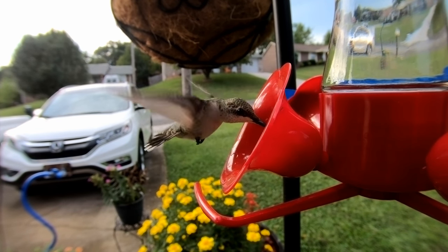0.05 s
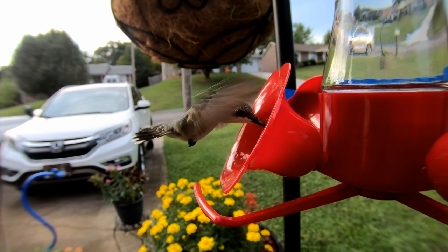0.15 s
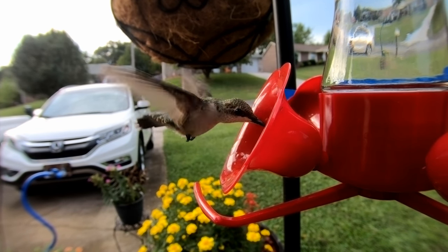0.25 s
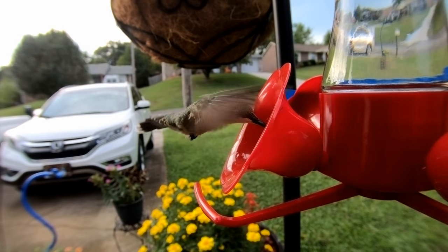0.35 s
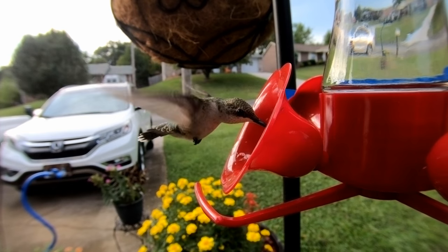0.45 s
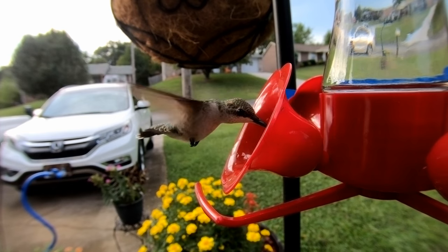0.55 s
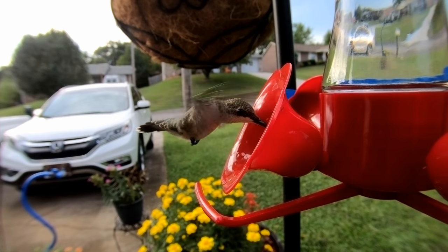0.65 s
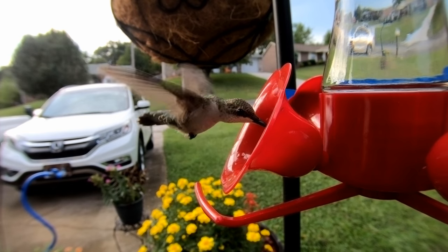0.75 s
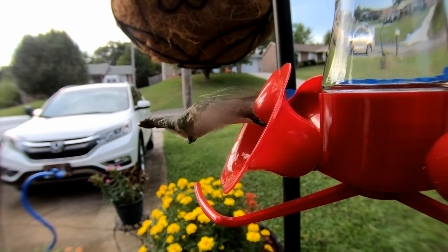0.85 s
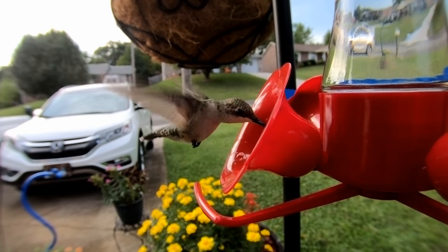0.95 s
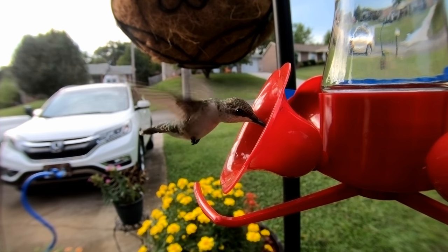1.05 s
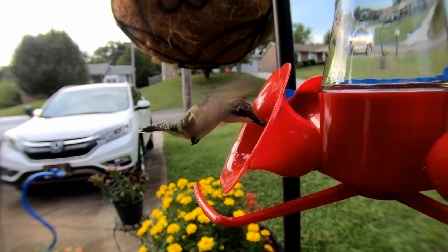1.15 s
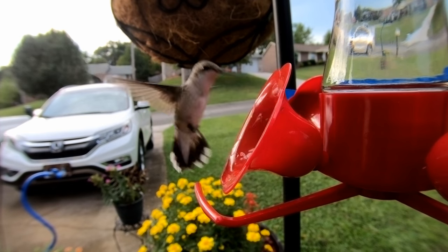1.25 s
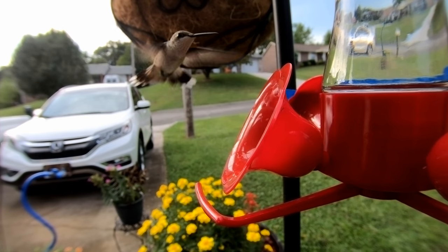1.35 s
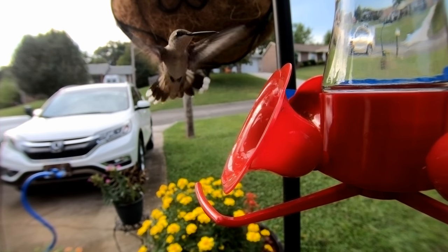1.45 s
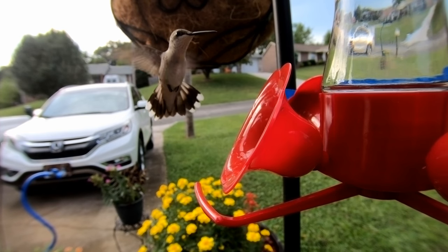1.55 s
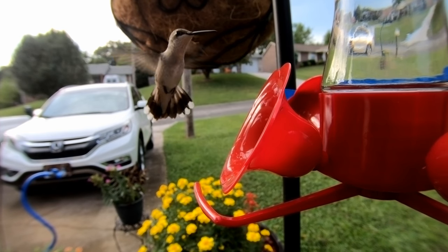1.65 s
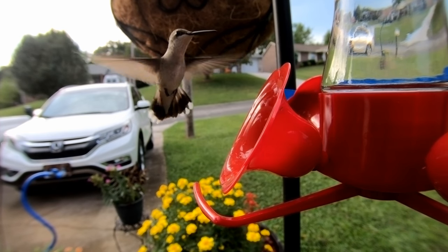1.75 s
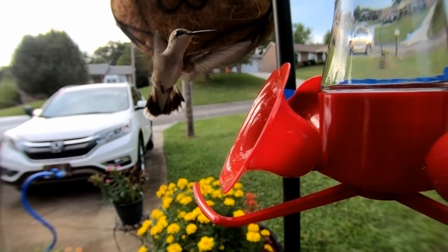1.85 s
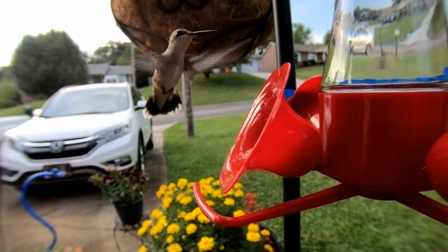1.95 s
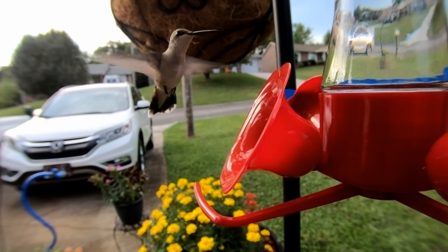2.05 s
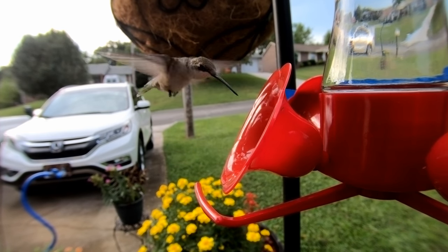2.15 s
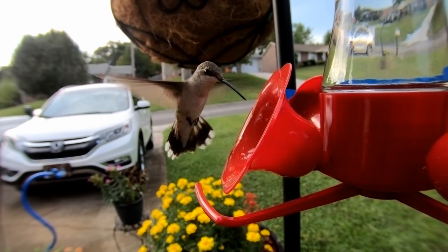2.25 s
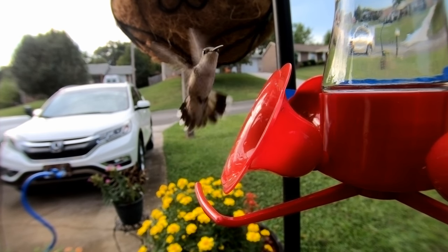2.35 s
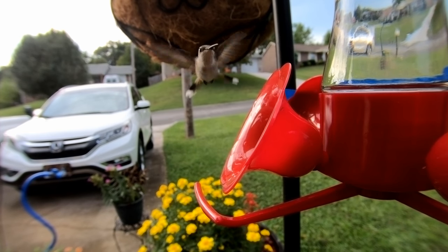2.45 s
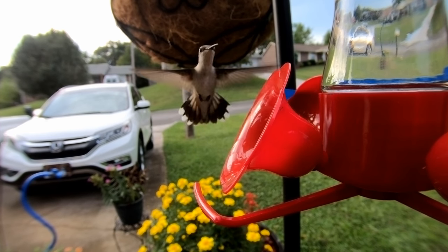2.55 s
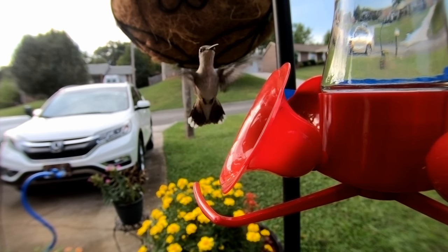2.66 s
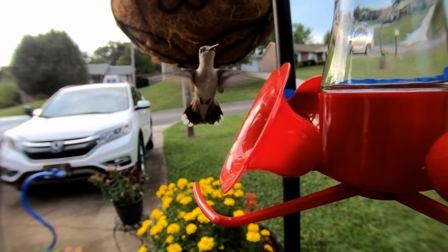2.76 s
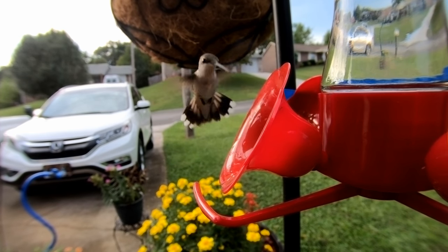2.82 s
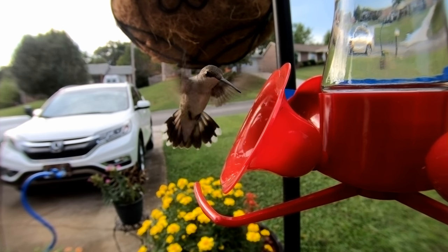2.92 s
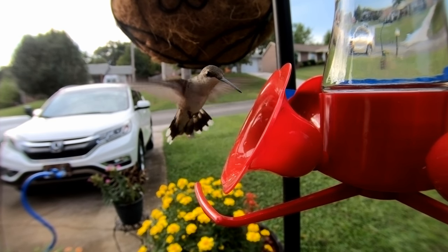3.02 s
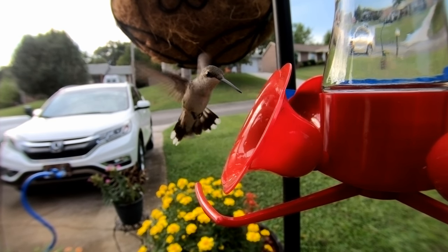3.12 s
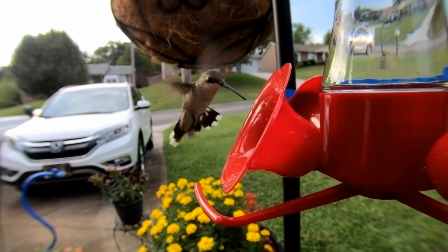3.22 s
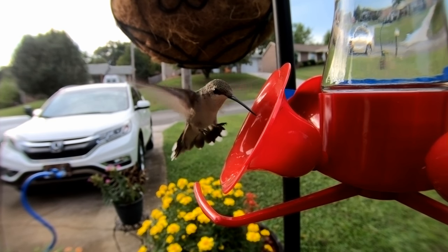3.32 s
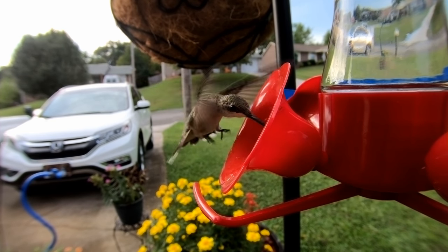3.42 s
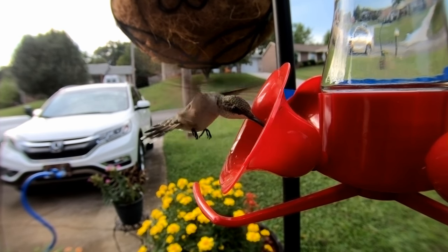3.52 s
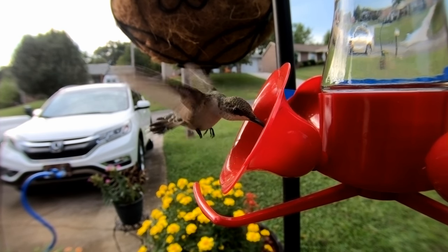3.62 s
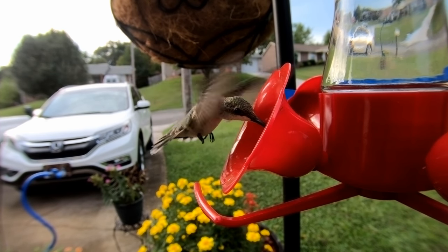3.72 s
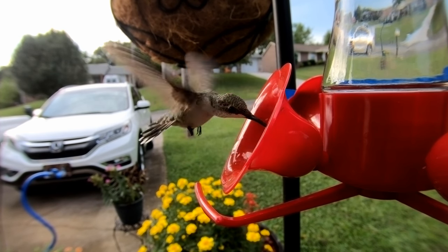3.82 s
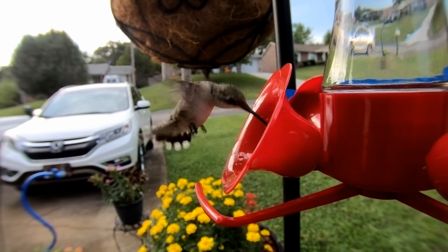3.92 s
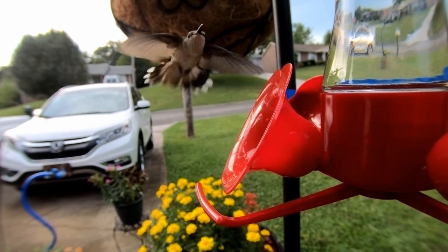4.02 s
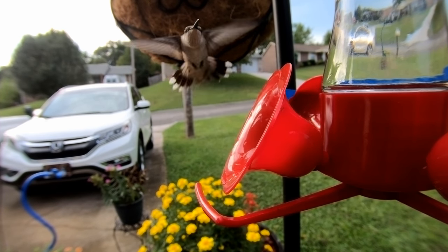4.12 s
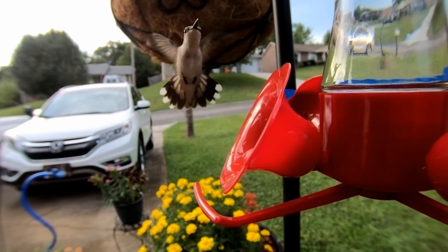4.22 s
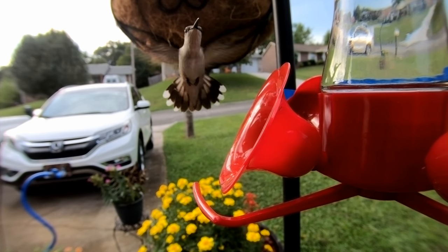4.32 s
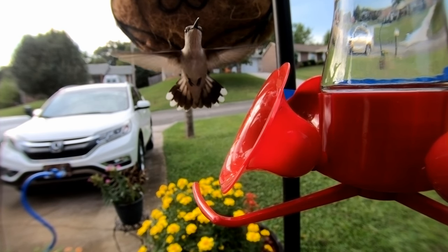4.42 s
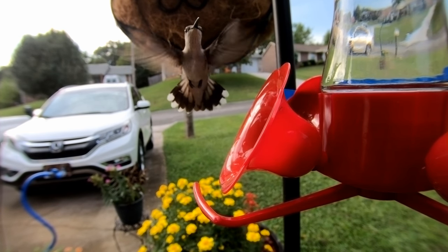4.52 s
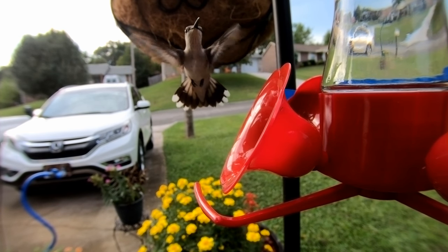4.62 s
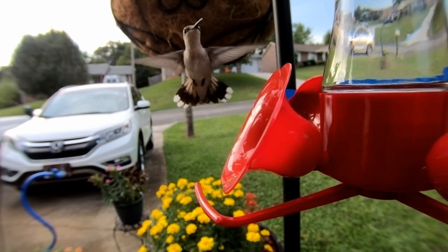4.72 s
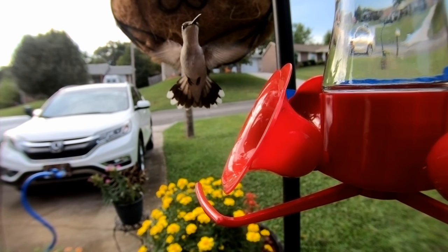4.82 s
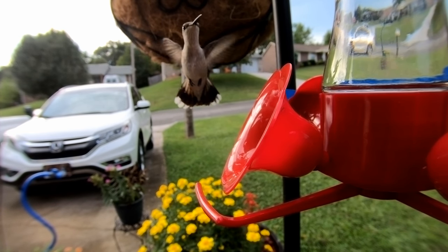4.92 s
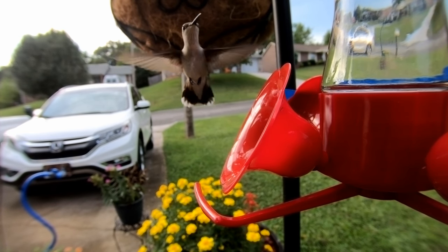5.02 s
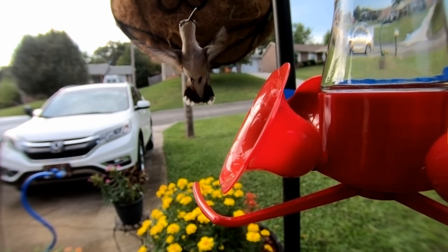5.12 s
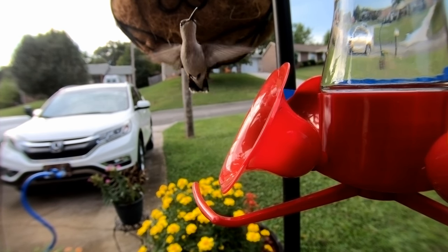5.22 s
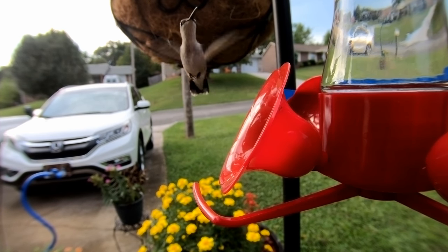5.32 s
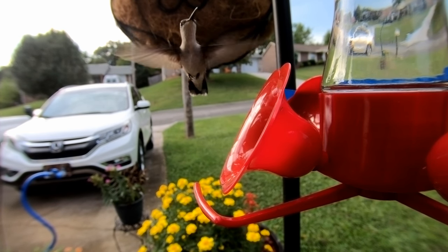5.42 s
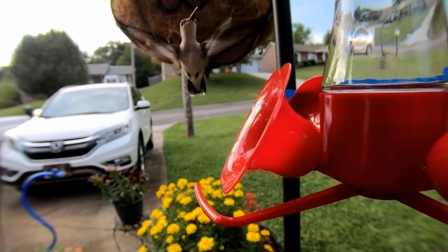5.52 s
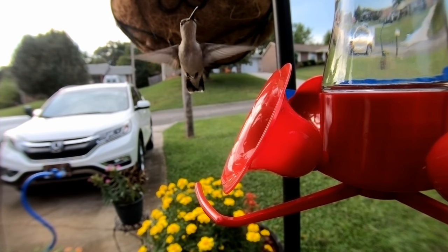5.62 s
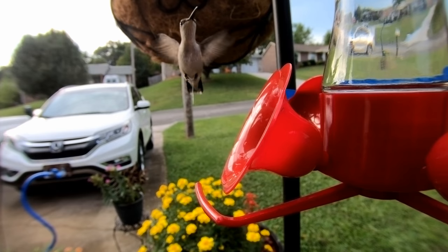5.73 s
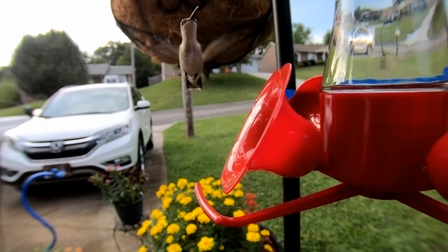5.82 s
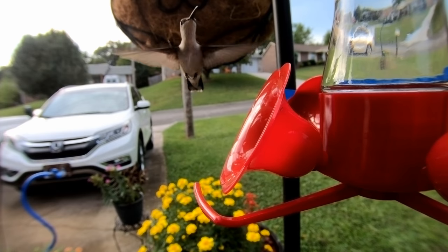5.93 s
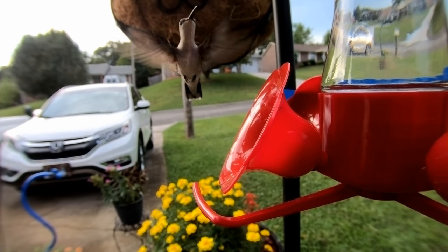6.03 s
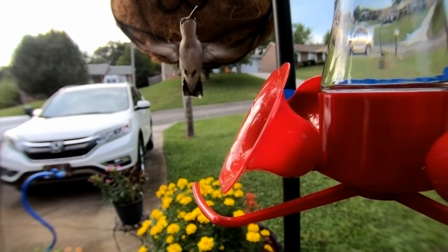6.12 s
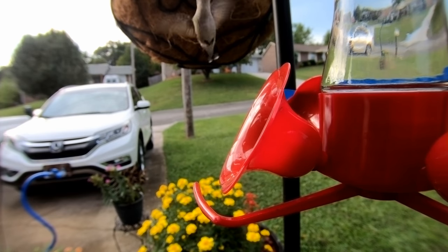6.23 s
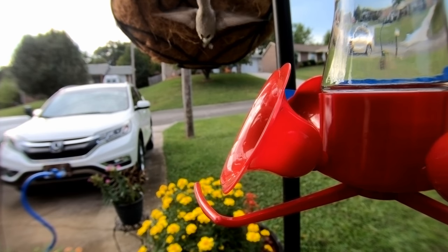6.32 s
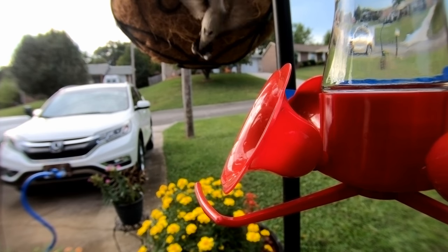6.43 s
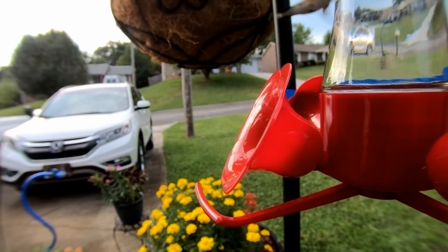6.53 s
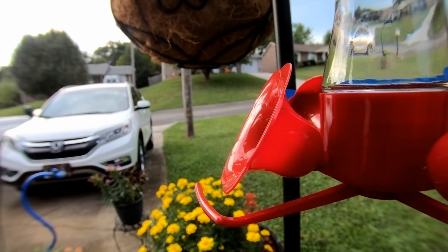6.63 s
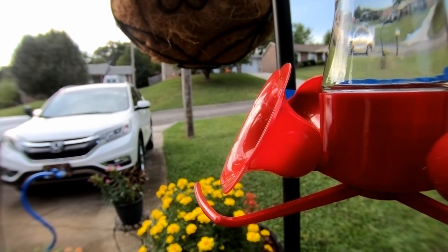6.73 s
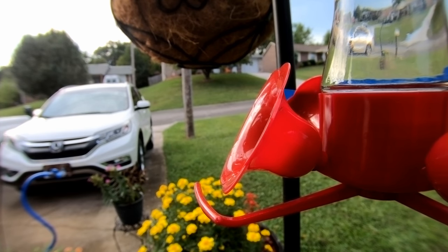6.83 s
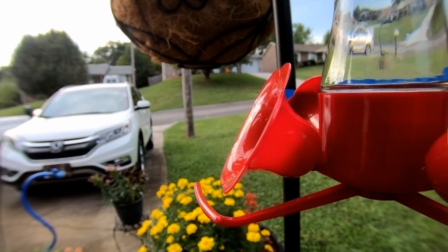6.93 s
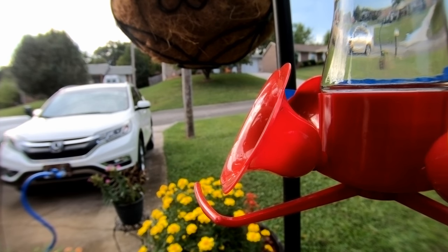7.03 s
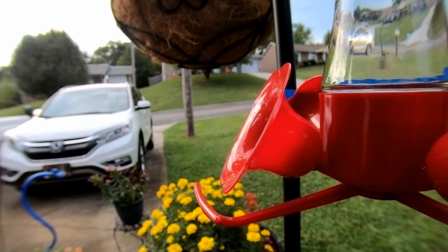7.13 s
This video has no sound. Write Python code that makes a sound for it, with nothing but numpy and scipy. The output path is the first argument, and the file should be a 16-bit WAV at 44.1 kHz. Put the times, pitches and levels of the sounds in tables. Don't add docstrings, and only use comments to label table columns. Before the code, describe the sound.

A small stereo microphone sits an arm's length from a garden feeder. From the start a hummingbird's low, buzzing wing hum dominates, roughly 41 to 46 strokes a second, with breathy chopped downwash. It rocks gently for the first second, then surges and breaks briefly around 1.3-1.6, 2.1-2.6 and 4.1-4.2 seconds, with low air buffets at 2.1-2.2. Upright hovering sounds buzzier. Underneath are steady leaf and insect hiss, faint traffic rumble, scattered dry ticks, soft feather flicks and very faint thin squeaks of the hook almost every second. Tiny distant bird chips come at 0.7, 2.2 and 4.95. At 4.9 a soft hollow knock bounces several times. From 6.2 stiff fabric snaps and crinkles near the microphones, strongest at 6.5-6.75. The hum hesitates near 6.4, a dull wing slap lands at 6.58, and the hum vanishes by about 6.7, leaving low wake puffs, lighter scraping and garden hiss until about 7.1.

```python
import sys
import numpy as np
from scipy import signal
from scipy.fft import rfft, irfft, next_fast_len
from scipy.io import wavfile
from scipy.ndimage import uniform_filter1d, map_coordinates

SR = 44100
rng = np.random.default_rng(int(sys.argv[2]) if len(sys.argv) > 2 else 0)


def store_pcm(level_fs):
    pcm = np.round(np.clip(level_fs, -1, 1) * 32767).astype(np.int16)
    wavfile.write(sys.argv[1], SR, np.atleast_2d(pcm).T)


def elevation(decibels):
    levels = np.asarray(decibels, float)
    return 10 ** (levels / 20)


N = 316197

# freq_hz, likeness_0_to_1
PORT_LIKENESS = [(60, 1), (140, 0.98), (310, 0.64), (690, .75), (1560, 0.099), (3520, 0.68), (6500, 0.79),
                 (9000, 0.081)]
# freq_hz, level_db
PORT_TILT = [(60, 2), (140, -2.5), (310, -5), (690, -1), (1300, 0.5), (3000, 3), (6500, -10), (9000, -3),
             (13000, -4)]
# freq_hz, lead_rad
PORT_LEAD = [(0, -2), (520, 0.8349), (1460, 2), (3190, 0.72), (3960, 1.5), (5430, 1), (6890, 5.5),
             (8100, -1)]
# freq_hz, level_db
MIC_RESPONSE = [(20, 11.5), (2000, -1.5), (6500, -4), (7600, -12.5), (8400, -28), (13000, -43),
                (16000, -63)]

# time_s, wingbeat_hz, effort_db, upright_0_to_1, upper_order_crispness_db
HOVER = [(0, 44.06, -27.5, 0.01, 4), (.25, 46.54, -30, 0.1, 4), (.4, 44.5, -31.5, 0.4, 4.5),
         (1.22, 43.1, -29, 0.28, 2.5), (1.5, 41.85, -28, 0.65, 1), (1.75, 41.34, -27, 1, 0.5),
         (2.05, 42.1, -29.5, 1, 1), (2.3, 43.8, -25.5, 0.63, -1.5), (2.68, 42.88, -28.5, 0.8, 0),
         (2.92, 41, -30, 0.9, -0.5), (3.3, 41.79, -27, 0.66, 1), (3.4, 46.3, -25.5, 0.39, 2.5),
         (4.0, 45.99, -28.5, 0.03, 2), (4.2, 41.33, -28.5, 0.87, 1), (5.12, 42.14, -25, 0.81, -4),
         (5.5, 42.41, -27, 0.61, -2.5), (6.2, 42.05, -26, 0.74, -2.5), (6.66, 44.32, -25.5, 0.8, -3)]
# time_s, half_length_s, extra_effort_db, faster_beat_hz
SURGES = [(1.055, 0.034, 2, 1), (1.349, 0.042, 8.5, 5.5), (1.625, 0.044, 2, 3.5), (2.096, 0.035, 10, 4),
          (2.419, 0.041, 7.5, 6), (3.063, 0.05, 7, 4.5), (3.429, 0.044, 2.5, 1), (3.577, 0.047, 1.5, 2.5),
          (3.856, 0.045, 4, 0), (4.067, 0.058, 9, 7.5), (4.28, .05, -0.5, 2.5), (4.83, 0.047, 1.5, .5),
          (6.272, .05, 5, 8), (6.551, .03, 4, 2.5), (6.668, 0.043, 4.5, 1), (2.17, 0.049, -0.5, 0)]
# time_s, half_length_s, lost_effort_db
GLIDES = [(1.125, 0.03, 4), (1.43, 0.025, 8.5), (1.53, 0.037, 11), (2.267, 0.02, 10), (2.496, .015, 12),
          (2.572, 0.036, 20.5), (2.806, 0.018, 2.5), (4.19, 0.041, 18.5), (6.35, 0.04, 17.5),
          (6.43, 0.055, 8.5), (6.6, .025, 6)]
# time_s, half_length_s, shift_hz
NUDGES = [(.12, 0.024, -2.5), (.27, 0.029, 1.5), (.35, 0.032, -1.5), (.63, 0.03, -1), (.8, .02, 2),
          (1.04, 0.034, 1.07), (1.33, 0.024, 4), (1.41, 0.039, -3.5), (1.55, .04, 2), (1.87, 0.026, 1),
          (2.03, 0.047, -1.5), (2.42, 0.02, 3), (2.5, 0.031, -3), (2.62, 0.035, 1.5), (2.87, 0.055, -1.06),
          (3.22, 0.037, 1.03), (3.3, 0.028, -1.5), (3.45, 0.032, -1.5), (3.56, 0.022, 1.5),
          (3.82, 0.028, -1.5), (3.97, .035, -2), (4.11, 0.041, -2.5), (4.39, 0.037, -1.5),
          (4.52, 0.043, -1.1), (4.65, .08, -1), (4.87, 0.026, -1), (4.95, 0.028, -1.44),
          (5.12, 0.038, 1.25), (5.2, 0.022, -1), (5.27, 0.034, 1.22), (5.55, 0.041, 0.62),
          (5.74, 0.061, -1.15), (5.83, 0.031, 1.5), (6.09, 0.083, -1.5), (6.42, .03, -2), (6.54, .035, 3)]
# time_s, half_length_s, shift_hz
MORE_NUDGES = [(.55, .4, -.21), (2.08, .03, -2.4), (2.2, .05, 5.7), (2.5, .2, -.36), (2.9, .1, -1.66),
               (3.5, .2, .18), (4.17, .04, 2.1), (4.9, .45, .16), (5.95, .2, -.47), (6.24, .05, -2.8),
               (6.36, .035, 9.5)]
# time_s, half_length_s, level_db
BRAKES = [(1.35, 0.045, 0), (2.1, 0.036, -1.5), (2.42, .04, -0.5), (3.05, 0.049, 0), (3.5, 0.11, -2),
          (4.07, 0.064, 1), (4.65, 0.1, 3.5), (6.27, .04, 1.5), (6.55, .05, -2)]
# time_s, half_length_s, level_db
GUSTS = [
    (.5, 1, 5.5),
    (1.36, 0.046, -1),
    (1.8, 0.28, 2),
    (2.11, 0.066, 11),
    (2.2, 0.045, 10.5),
    (2.53, 0.036, 4),
    (3.7, 0.54, 8.5),
    (6.55, 0.1, 7.5),
    (6.67, 0.11, 5.5),
    (7.13, .05, 14),
]
# time_s, left_minus_right_db
BIRD_SIDE = [(0, -3), (.8, -4), (1.8, -1), (3, -1), (3.9, -3), (4.5, 0.84), (7.17, 1)]

# level_re_effort_db, growth_with_push_db_per_db
LOW_ORDERS = [(-3, 1.27), (-6.5, 0.83), (-26.5, 0.57)]
# order, level_db, share_of_upright_gain, extra_growth_db_per_db
UPPER_ORDERS = [(4, 7, 0.52, 0.13), (5, 0.5, 0.97, 0), (6, -5, 0.54, 0.59), (7, -9, 0.75, 0.43),
                (8, -13.5, 0.46, 0.88), (9, -17.5, 0.37, 1.9), (10, -20, 0.7, 0.79), (11, -24.5, 0.3, 0.69),
                (12, -28.5, 0.39, 0.41)]
BACKSTROKE_SHIFT = {1: .24, 2: -.12, 5: -.33}
# freq_hz, level_db_per_hz
BUFFET_SPECTRUM = [(15, -16.5), (26, -8.5), (70, 1), (130, -5.5), (200, -18), (320, -35), (600, -74.5),
                   (1200, -120)]
# freq_hz, level_db_per_hz
SWISH_SPECTRUM = [(120, -38), (220, -2), (400, -5), (800, -13), (1600, -23), (3000, -29.5), (6000, -38),
                  (8000, -120)]
# time_s, half_length_s, level_db, pitch_hz
VORTICES = [(2.146, 0.01, -21.5, 70), (2.169, 0.026, -23, 52.2), (2.217, .022, -19.5, 46),
            (2.246, .012, -30, 70.4), (2.518, 0.023, -34.5, 75.87), (2.541, 0.018, -30, 70),
            (6.648, 0.016, -19.5, 45.54), (6.67, 0.0082, -23, 74.4), (6.696, 0.012, -26, 61),
            (6.713, .014, -24, 48.3), (6.757, 0.049, -27, 20.5), (6.818, 0.032, -33, 27.7),
            (6.926, 0.034, -49.5, 91), (7.11, 0.036, -46.5, 44.5)]
# start_s, peak_db, t60_s
FLICKS = [(0.6743, -45.5, 0.26), (0.797, -44.5, 0.15), (0.8771, -48, 0.08), (1.0842, -45.5, 0.23),
          (1.3345, -43, 0.047), (2.0716, -42.5, 0.26), (2.1075, -45, 0.31), (2.138, -50, 0.47),
          (2.397, -56, 0.17), (2.44, -43, 0.16), (4.032, -46, 0.091), (4.0766, -42.5, 0.046),
          (4.2079, -47, 0.17), (5.1403, -42.5, 0.13)]

# freq_hz, level_db_per_hz
GARDEN_SPECTRUM = [(290, -33), (500, -5.5), (840, -5), (1200, -7.5), (1600, -13), (2000, -15),
                   (2520, -21.5), (3340, -13.5), (4500, -17), (5500, -17.5), (6700, -11.5), (7300, -14),
                   (8000, -32.5), (9000, -76)]
# freq_hz, level_db_per_hz
AIRY_SPECTRUM = [(7000, -42), (8300, -3), (10000, -4), (13200, -11.5), (13900, -23.5), (15700, -27),
                 (16200, -68)]
# freq_hz, level_db_per_hz
TRAFFIC_SPECTRUM = [(12, -15.5), (25, -2.5), (50, 1.5), (100, -8), (160, -5.5), (250, -14), (400, -22),
                    (700, -50), (1300, -100)]
# start_s, length_s, level_db
SWINGS_OUT = [(-.06, 0.19, -64.5), (0.898, 0.19, -64), (1.839, 0.16, -62), (2.724, 0.18, -65),
              (3.585, 0.14, -63), (4.417, 0.21, -65.5), (5.222, 0.23, -64.5), (5.981, 0.16, -61)]
# start_s, length_s, level_db
SWINGS_BACK = [(1.47, 0.087, -70), (2.283, 0.077, -68.5), (3.05, 0.12, -67.5), (3.85, 0.11, -68.5),
               (4.63, 0.092, -71)]
# start_s, peak_db, pitch_hz
TICKS = [(0.182, -54.5, 2650), (0.343, -54, 2510), (.402, -47, 1580), (0.494, -45, 847), (0.876, -57, 1767),
         (0.99, -47, 1040), (1.091, -54, 6020), (1.187, -47, 1043), (1.664, -47, 1055), (1.783, -48, 2020),
         (1.934, -49.5, 1770), (1.972, -45, 3186), (2.078, -56.5, 3500), (2.322, -47, 2028),
         (2.363, -48, 1590), (2.476, -54, 2187), (2.981, -54, 1887), (3.216, -48.5, 3036),
         (3.323, -51, 1360), (3.485, -51.5, 3496), (3.549, -49.5, 3200), (3.652, -47.5, 1885),
         (3.717, -52, 3180), (4.333, -56, 2070), (4.8, -50, 3278), (4.962, -53, 3400), (5.095, -47.5, 1471),
         (5.4, -53, 3115), (5.458, -47, 2071), (5.674, -53, 1423)]
# start_s, peak_db, pitch_hz
MORE_TICKS = [(5.987, -49, 1376), (.245, -58, 3750), (6.19, -47, 2050), (6.194, -44, 4400), (6.222, -48, 5400),
              (6.327, -46.5, 3700), (6.345, -52, 1900), (6.496, -46, 4200), (6.522, -43, 2230),
              (6.572, -41, 1400), (6.571, -43, 490), (6.571, -46, 340), (6.649, -40, 2250), (6.704, -41, 2700),
              (6.712, -43, 5200), (6.965, -53, 2050), (7.14, -61, 966), (7.004, -45, 2100), (7.006, -46, 900),
              (7.036, -52, 950), (4.29, -56, 3250), (4.207, -50, 1400), (.698, -50, 1100), (.79, -49, 1100),
              (.672, -51, 1350), (1.34, -43.5, 660), (1.375, -46, 500), (2.066, -44, 820), (4.033, -45, 620),
              (4.555, -56, 1900), (5.14, -48, 1700), (6.74, -46, 480), (2.572, -56, 2020), (2.965, -49, 950)]
# start_s, peak_db, left_minus_right_db
CHIPS = [
    (0.723, -54.5, -11),
    (2.245, -55.5, -6),
    (4.951, -51, -9),
]
# start_s, level_db, pitch_hz
KNOCKS = [
    (4.871, -43, 458.3),
    (4.881, -42, 545.6),
    (4.889, -41, 411),
    (4.897, -31, 366.4),
    (4.909, -39.5, 496),
    (4.92, -34, 383.5),
    (4.937, -41.5, 539.4),
    (4.943, -45, 348),
    (4.958, -37.5, 353),
]
# start_s, peak_db, pitch_hz, brightness_db
SNAPS = [(6.1904, -32, 4550, -10), (6.2208, -40.5, 3226, 2), (6.2911, -49, 2150, -10),
         (6.326, -38, 2118, -8), (6.3757, -38, 6410, 17), (6.4937, -27, 3407, -4), (6.5218, -34, 3340, -12),
         (6.5443, -41, 5610, 5), (6.572, -37, 6380, 13), (6.6074, -35.5, 5820, 12),
         (6.625, -35.5, 6500, 19), (6.6487, -33.5, 2346, -7), (6.6805, -34.5, 6400, 17),
         (6.7035, -32, 6560, 9), (6.724, -34, 5600, 22), (6.7357, -36, 6300, 20), (6.8416, -43, 2330, -21),
         (6.8995, -43, 6240, -6), (6.994, -42, 2050, -17), (7.0074, -44, 2100, -25),
         (7.1606, -41, 6020, -7)]
# time_s, level_db
SCRAPE = [
    (6.1, -63),
    (6.2, -52.5),
    (6.385, -53),
    (6.46, -69),
    (6.55, -49),
    (6.73, -49.5),
    (6.79, -55.5),
    (7.02, -52.5),
    (7.12, -57.5),
]
# freq_hz, level_db
SCRAPE_SPECTRUM = [(500, -9.5), (950, -0.5), (1450, -4.5), (2080, -3.0), (2700, -7.0), (4000, -8.0),
                   (6300, -9.0), (7600, -14.0), (8600, -43.0)]
# freq_hz, level_db
SCRAPE_AIR_SPECTRUM = [(7500, -40), (8500, 0), (11000, -4), (14000, -14), (15500, -50)]


def unit(x):
    return x / np.sqrt(np.mean(x ** 2) + 1e-20)


def along(points, hz):
    f, v = np.transpose(points)
    return np.interp(np.log(hz + 1), np.log(f + 1), v)


def curves(rows):
    s, *cols = np.transpose(rows)
    return [np.interp(np.arange(N) / SR, s, c) for c in cols]


def wobble(rate):
    at = np.arange(0, N + 16, 16)
    knots = rng.standard_normal(int(N * rate / SR) + 4)
    return np.interp(np.arange(N), at, map_coordinates(knots, [at * rate / SR]))


def bumps(rows, skew=1):
    t = np.arange(0, N + 64, 64) / SR
    total = sum(h * np.exp(-((t - s) / w * np.where(t < s, skew, 1 / skew)) ** 2) for s, w, h in rows)
    return np.interp(np.arange(N) / SR, t, total)


def filtered(x, response):
    m = next_fast_len(x.shape[-1] + 8192)
    return irfft(rfft(x, m) * response(np.fft.rfftfreq(m, 1 / SR)), m)[..., :x.shape[-1]]


def panned(x, db):
    return np.array([x * elevation(db / 2), x * elevation(-db / 2)])


def add(out, s, x):
    at = round(s * SR)
    x, at = x[:, max(-at, 0):], max(at, 0)
    out[:, at:at + x.shape[1]] += x[:, :N - at]


def peak(hz, centre_hz, width_hz):
    return width_hz * hz / np.hypot(centre_hz ** 2 - hz ** 2, width_hz * hz + 1)


def rush(spectrum, patchy_db):
    z = signal.stft(rng.standard_normal((2, N + 512)), nperseg=512)[2]
    field = uniform_filter1d(rng.standard_normal(z.shape[1:]), size=6, axis=0)
    field = uniform_filter1d(field, size=6, axis=1)
    pair = signal.istft(z * elevation(patchy_db * unit(field)), nperseg=512)[1][:, :N]

    def mid_side(hz):
        angle = np.arccos(np.clip(along(PORT_LIKENESS, hz), 0, 1)) / 2
        return elevation(along(spectrum, hz)) * [np.cos(angle), np.sin(angle)]

    def ports(hz):
        left = elevation(along(PORT_TILT, hz) / 2) * np.exp(.5j * along(PORT_LEAD, hz))
        return left ** np.array([[1], [-1]])

    mid, side = filtered(pair, mid_side)
    return unit(filtered(np.array([mid + side, mid - side]), ports))


def puff(rise, t60, response):
    t = np.arange(SR // 6) / SR
    noise = rng.standard_normal(len(t)) + 1.1 * rng.standard_normal((2, len(t)))
    coloured = filtered(noise, lambda hz: response(hz) * elevation(along(MIC_RESPONSE, hz)))
    return unit(coloured) * elevation(-60 * t / t60 - 2.0) * (1 - np.exp(-t / rise))


def ring(hz):
    t = np.arange(SR // 6) / SR
    return elevation(-7 - 60 * t * hz / (35 + hz * .02)) * np.sin(2 * np.pi * hz * t) * (1 - np.exp(-t / .002))


def flight():
    rock_s, rock_period_s, rock_end_s = 0.048, 0.1262, 1.15
    leaves_s, fade_db_per_s = 6.625, 440
    beat_hz, effort_db, upright, crisp_db = curves(HOVER)
    t = np.arange(N) / SR
    glide_db = bumps(GLIDES)
    rock = np.cos(2 * np.pi * (t - rock_s) / rock_period_s) * np.clip((rock_end_s - t) / 0.034, 0, 1)
    push_db = bumps([row[:3] for row in SURGES]) - glide_db + rock
    beat_hz = beat_hz + bumps([(s - .03, w, hz) for s, w, _, hz in SURGES], skew=1.3)
    beat_hz = beat_hz + 1.1 * rock - 0.1216 * glide_db + bumps(NUDGES + MORE_NUDGES)
    away_db = fade_db_per_s * np.clip(t - leaves_s, 0, 1)
    return beat_hz, effort_db, push_db, glide_db, away_db, upright, crisp_db


def wing_hum(turn, orders, lean):
    waves = []
    for k, db in orders:
        phase = k * turn + .04 * k * k - .3 + BACKSTROKE_SHIFT.get(k, 0) - lean / k + .08 * wobble(10)
        waves.append(-np.sqrt(2) * elevation(db + .9 * wobble(12)) * np.cos(phase))
    side_db, = curves(BIRD_SIDE)
    hum = panned(waves[0], .6 * side_db) + panned(sum(waves[1:]), 1.2 * side_db)
    return hum * elevation(.8 * wobble(20)) * np.clip(np.arange(N) / SR / 0.0027, 0, 1)


def downwash(turn, swish_db, buffet_db):
    gated_hz = 750
    gate = unit(1.0 + (.5 + .5 * np.cos(turn)) ** 2)
    swish = elevation(swish_db + 0.48 * wobble(27)) * rush(SWISH_SPECTRUM, patchy_db=2.5)
    swish = swish + (gate - 1) * filtered(swish, lambda hz: 1 / (1 + (hz / gated_hz) ** 4))
    buffet = elevation(buffet_db + .6 * wobble(9)) * rush(BUFFET_SPECTRUM, patchy_db=.6)
    return swish + buffet


def wings():
    usual_db, upright_gain_db, wake_lags_db, first_turn_rad = -27.5, 12, 40, 4.1
    beat_hz, effort_db, push_db, glide_db, away_db, upright, crisp_db = flight()
    gust_db = bumps(GUSTS)
    turn = 2 * np.pi * np.cumsum(beat_hz * (1 + .003 * wobble(11))) / SR + first_turn_rad

    shared_db = effort_db + crisp_db - 0.35 * gust_db - away_db
    two_db, three_db, top_db = [shared_db + db + grows * push_db for db, grows in LOW_ORDERS]
    two_db = two_db + bumps(BRAKES)
    orders = [(1, effort_db + push_db - away_db), (2, two_db), (3, three_db)]
    for k, db, share, more in UPPER_ORDERS:
        posture_db = share * upright_gain_db * upright
        orders.append((k, top_db + db + posture_db + more * np.maximum(push_db, 0)))
    lean = .6 * np.clip((two_db + 29) / 9, 0, .8)

    wake_away_db = np.maximum(away_db - wake_lags_db, 0)
    buffet_db = -38.5 + .35 * push_db + gust_db - 0.41 * np.minimum(wake_away_db, 40)
    swish_db = -52.5 + 0.9 * (push_db + glide_db) - 0.59 * glide_db + 0.13 * gust_db
    swish_db += .72 * (effort_db - usual_db) - 0.694 * np.minimum(wake_away_db, 26)
    return wing_hum(turn, orders, lean) + downwash(turn, swish_db, buffet_db)


def garden():
    hiss_db = -55.5 + 0.96 * wobble(4.5) + 0.58 * wobble(14)
    top_db = -84 + 1.3 * wobble(5.5) + 3.5 * wobble(30)
    traffic_db = -46 + 1.2 * wobble(2.913)
    hiss = elevation(hiss_db) * rush(GARDEN_SPECTRUM, patchy_db=2.1)
    top = elevation(top_db) * rush(AIRY_SPECTRUM, patchy_db=1.5)
    return hiss + top + elevation(traffic_db) * rush(TRAFFIC_SPECTRUM, patchy_db=1)


def squeak(out, swing, slip_hz, bright_hz, tight_hz):
    s, span, db = swing
    out_swing = tight_hz > 0
    u = np.arange(int(span * SR)) / (span * SR)
    turn = 2 * np.pi * np.cumsum(slip_hz * (1 - .03 * (u - .55) ** 2 - .008 * np.exp(-u / .12))) / SR
    start = np.exp(-(u / .27) ** 4)
    ring_hz = bright_hz + tight_hz * start
    keeps = 1 - out_swing * (1 - start) * .13 * s
    envelope = np.sin(np.pi * u ** 0.27) ** 0.38
    for k, chance in zip(range(15, 22), rng.random((7, 2))):
        wire = keeps * peak(k * slip_hz, ring_hz, 190) ** 2
        wire = wire + 0.45 * out_swing * (1 - .7 * start) * peak(k * slip_hz, 3300, 150) ** 2
        wire = wire + 0.3 * (k % 2) + 0.22 * (1 - out_swing)
        wire = wire * elevation(1.3 * map_coordinates(rng.standard_normal(12), [1 + 9 * u]))
        tone = elevation(db + 1.7 * chance[0]) * wire * envelope * np.sin(k * turn + 7 * chance[1])
        add(out, s, panned(tone, -1.5))


def hook():
    out = np.zeros((2, N))
    for swing in SWINGS_OUT:
        squeak(out, swing, slip_hz=194.4, bright_hz=3710, tight_hz=170)
    for swing in SWINGS_BACK:
        squeak(out, swing, slip_hz=190, bright_hz=3605, tight_hz=0)
    return out


def ticks():
    out = np.zeros((2, N))
    for s, db, hz in TICKS + MORE_TICKS:
        body = puff(0.0022, 0.092, lambda f: peak(f, hz, .14 * hz + 50) ** 2 + 0.076 * peak(f, 2000, 2600))
        contact = 0.63 * body + 1.05 * ring(hz)
        add(out, s, elevation(db + 5.5) * contact * panned(np.ones(1), 1.6))
    return out


def feather_flicks():
    out = np.zeros((2, N))
    for s, db, t60 in FLICKS:
        flick = puff(0.0038, t60, lambda f: peak(f, 920, 1100) + 0.061 * peak(f, 3800, 3000))
        add(out, s, elevation(db) * flick)
    return out


def far_bird():
    out, u = np.zeros((2, N)), np.arange(750) / 750
    pitch_hz = 5300 + 1900 * np.sin(u * np.pi / 2)
    chip = np.sin(np.pi * u) ** 0.53 * np.sin(2 * np.pi * np.cumsum(pitch_hz) / SR)
    for s, db, pan_db in CHIPS:
        add(out, s, panned(elevation(db) * chip, pan_db))
    return out


def vortices():
    out = np.zeros((2, N))
    for s, half, db, hz in VORTICES:
        reach = int(2.5 * half * SR)
        t = np.arange(-reach, reach) / SR
        phase = 2 * np.pi * hz * t * (1 + 1.7 * t) + np.pi + rng.normal(0, 0.16)
        dip = np.sqrt(2) * elevation(db) * np.exp(-(t / half) ** 2) * np.cos(phase)
        add(out, s + t[0], panned(dip, -.7))
    return out


def knock():
    t60_s = .08
    out, t = np.zeros((2, N)), np.arange(SR // 3) / SR
    for s, db, hz in KNOCKS:
        tone = elevation(db + 6.5 - 60 * t / t60_s) * np.sin(2 * np.pi * hz * t) * (1 - np.exp(-t / 0.0018))
        add(out, s, panned(tone, -5.5))
    return out


def rustle():
    out = np.zeros((2, N))
    for s, db, hz, bright_db in SNAPS:
        low, high = elevation(-7 - bright_db), elevation(-1.5 + bright_db)
        pan_db = 1 - 8 * np.log2(hz / 4000)
        tone = lambda f: (low * peak(f, 1640, 2000) + .5 * peak(f, 5700, 1100)
                          + high * peak(f, 6790, 2600) + 2.5 * peak(f, hz, 280))
        snap = puff(0.0028, 0.058, tone) + .6 * ring(hz)
        add(out, s, elevation(db - 1) * snap * panned(np.ones(1), pan_db))
    scrape_db, = curves(SCRAPE)
    air_db = scrape_db - 31.5 + bumps([(6.69, 0.13, 13.5)])
    on = np.clip((np.arange(N) / SR - SCRAPE[0][0]) / 0.089, 0, 1)
    crinkle = elevation(1.5 * wobble(70) + 1.0 * wobble(250))
    scrape = unit(crinkle * rush(SCRAPE_SPECTRUM, patchy_db=2.0))
    air = unit(crinkle * rush(SCRAPE_AIR_SPECTRUM, patchy_db=.7))
    return out + on * (elevation(scrape_db - 2.0) * scrape + elevation(air_db) * air)


def wing_slap():
    slap_s, half_s, level_db, pitch_hz = 6.579, .004, -28.5, 450
    t = np.arange(N) / SR - slap_s
    return -panned(elevation(level_db) * np.exp(-(t / half_s) ** 2) * np.cos(2 * np.pi * pitch_hz * t), 0)


def scene():
    bird = wings() + feather_flicks() + vortices() + wing_slap()
    place = garden() + hook() + ticks() + far_bird() + knock()
    return bird + place + rustle()


def roll_off(x):
    return signal.sosfilt(signal.butter(12, 15800, fs=SR, output="sos"), x)


def record(dry):
    return roll_off(dry)


dry = scene()
out = record(dry)
store_pcm(out)
```